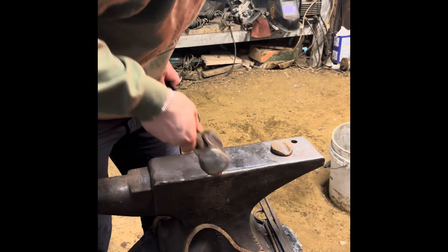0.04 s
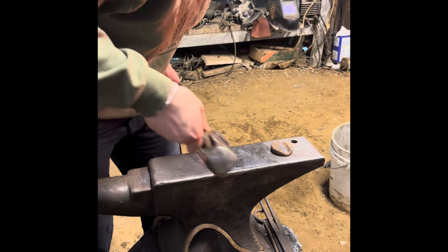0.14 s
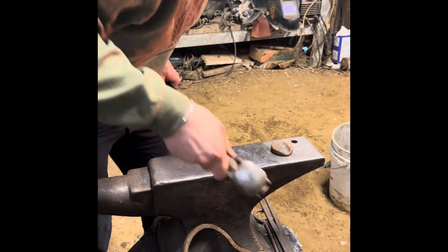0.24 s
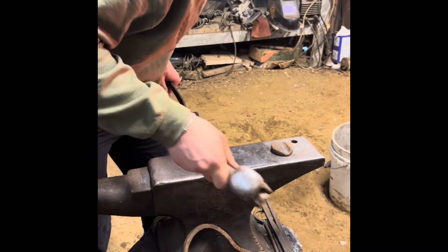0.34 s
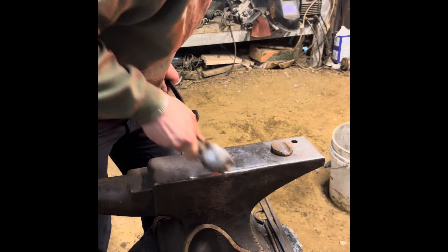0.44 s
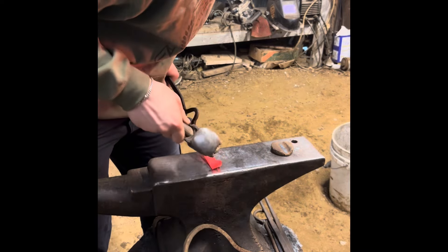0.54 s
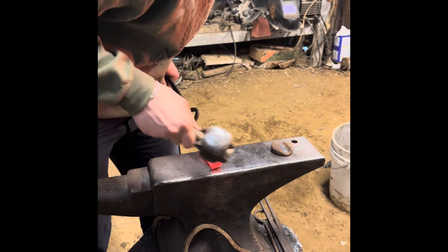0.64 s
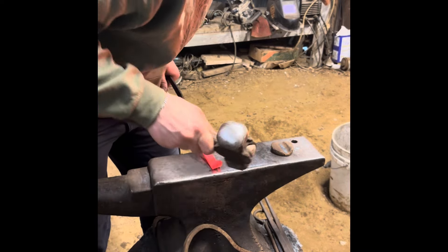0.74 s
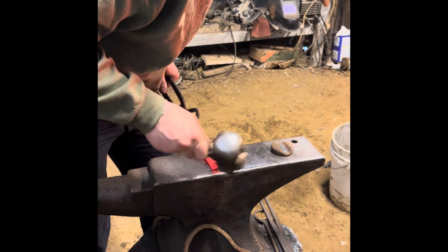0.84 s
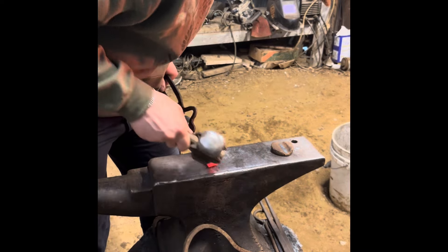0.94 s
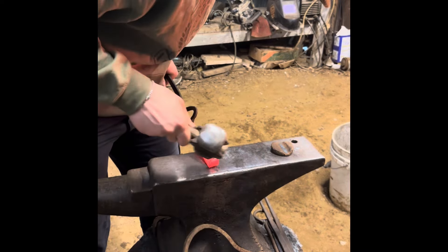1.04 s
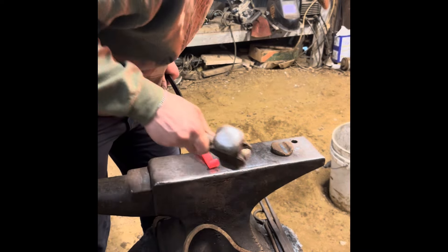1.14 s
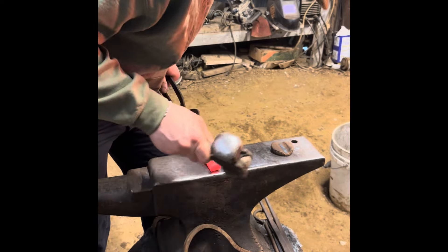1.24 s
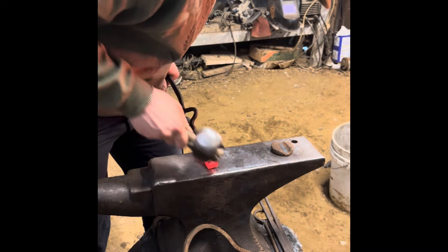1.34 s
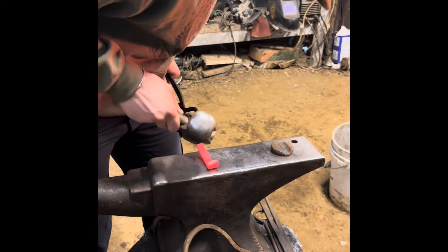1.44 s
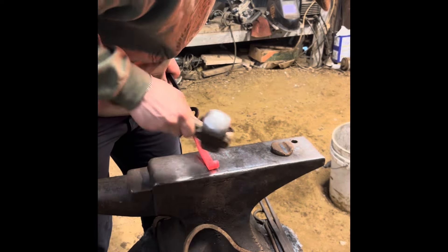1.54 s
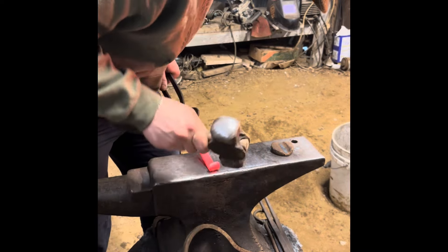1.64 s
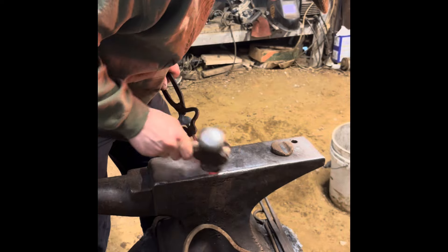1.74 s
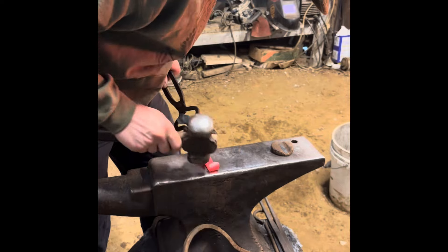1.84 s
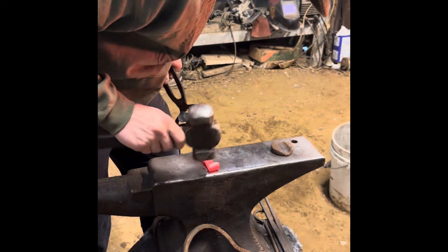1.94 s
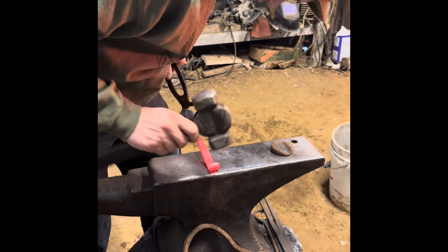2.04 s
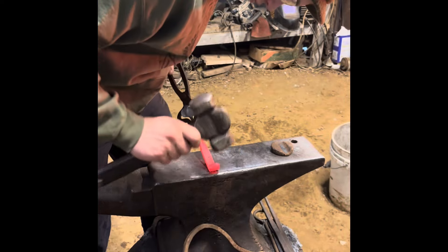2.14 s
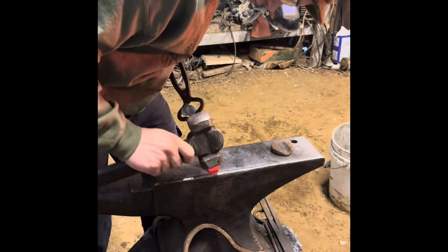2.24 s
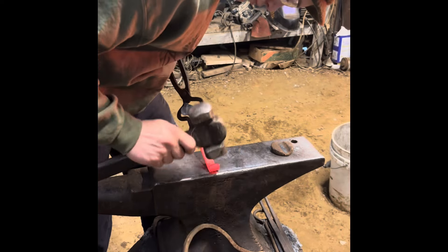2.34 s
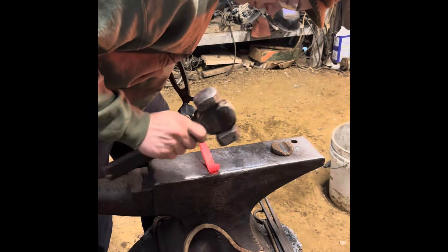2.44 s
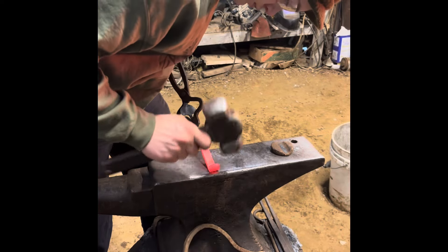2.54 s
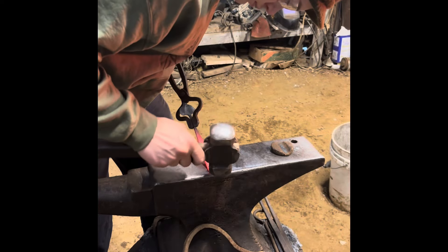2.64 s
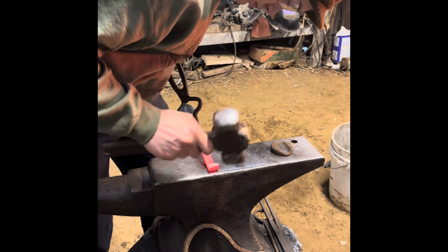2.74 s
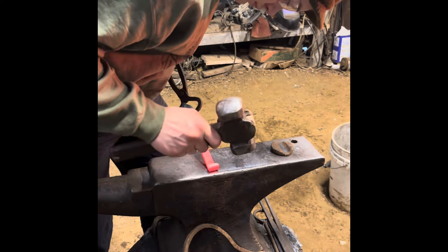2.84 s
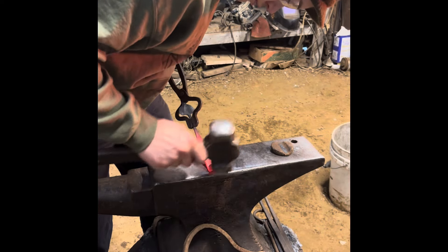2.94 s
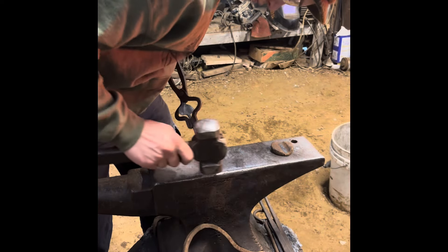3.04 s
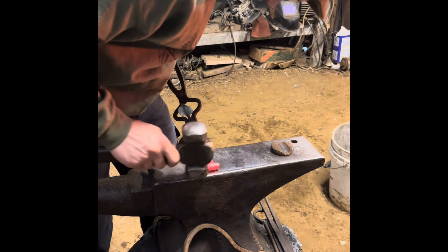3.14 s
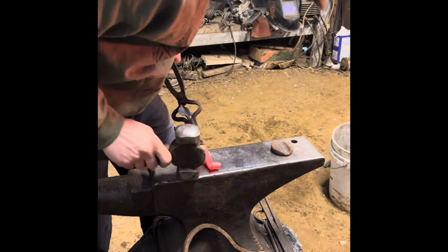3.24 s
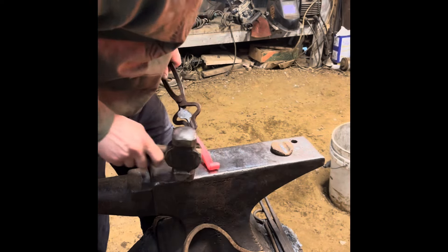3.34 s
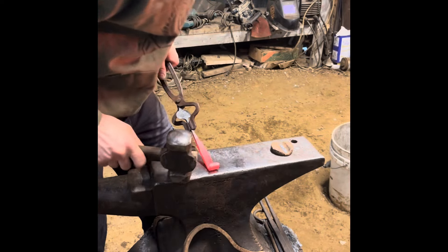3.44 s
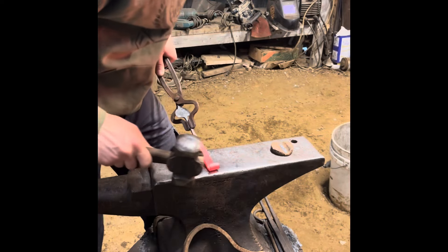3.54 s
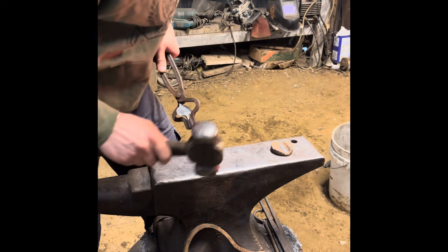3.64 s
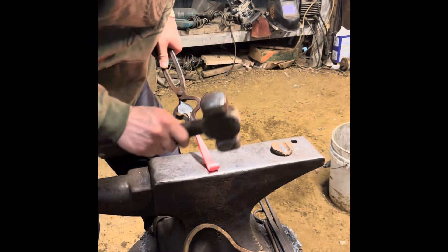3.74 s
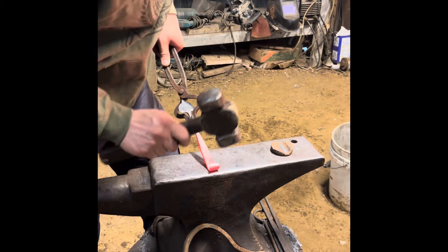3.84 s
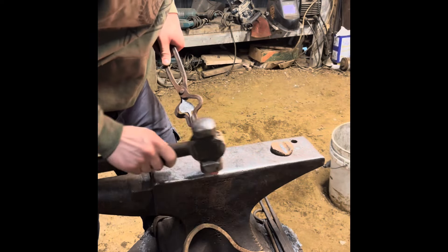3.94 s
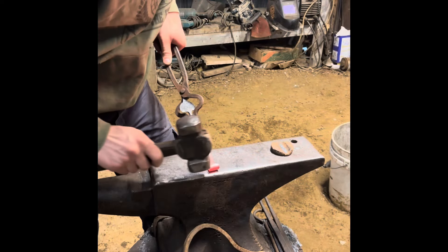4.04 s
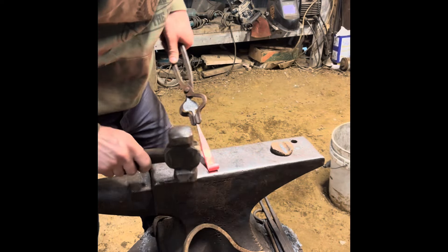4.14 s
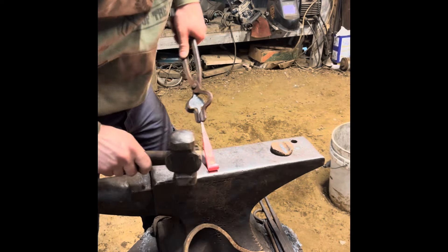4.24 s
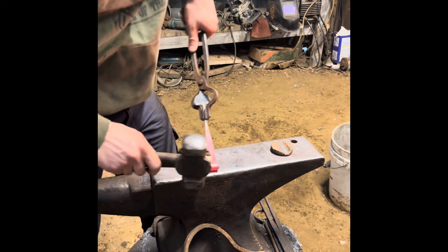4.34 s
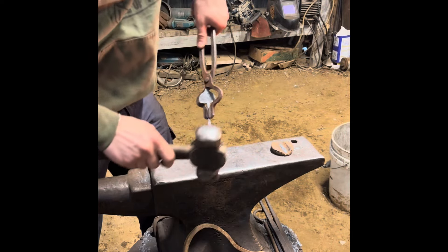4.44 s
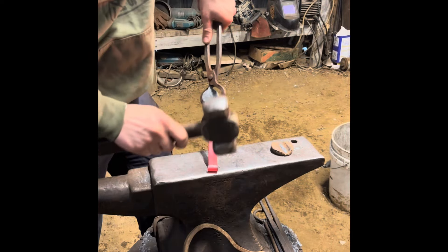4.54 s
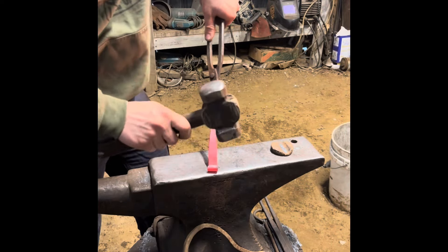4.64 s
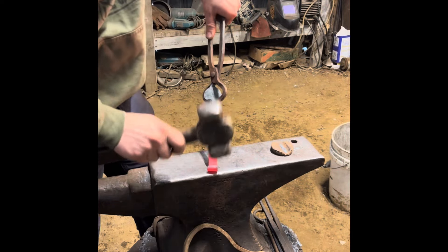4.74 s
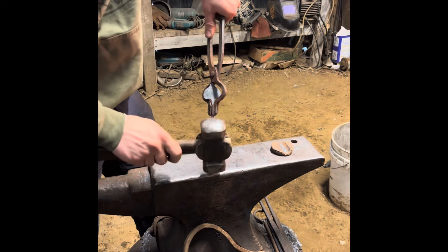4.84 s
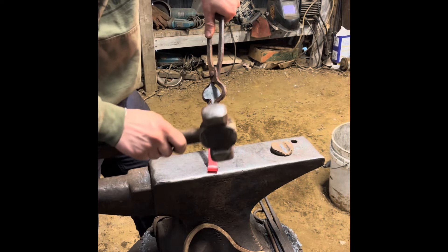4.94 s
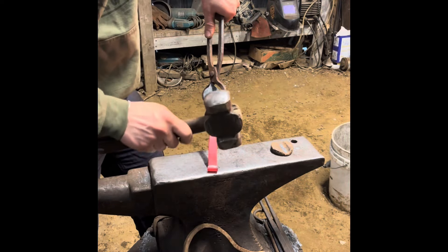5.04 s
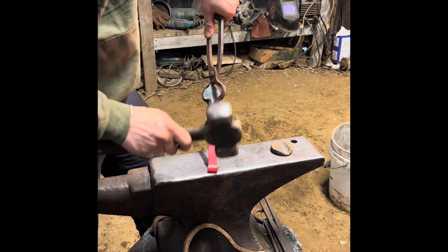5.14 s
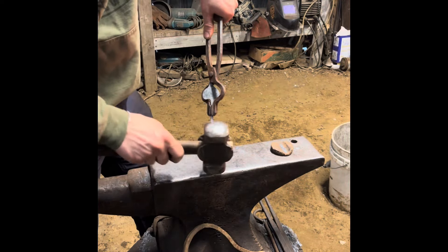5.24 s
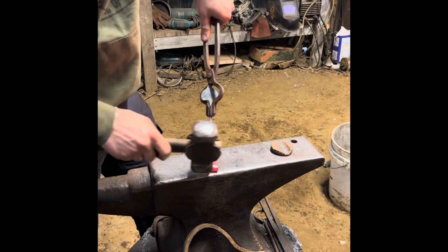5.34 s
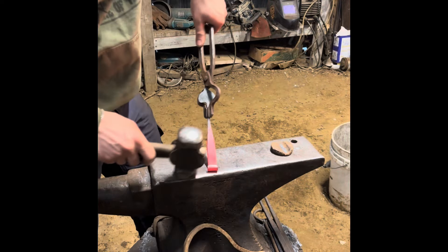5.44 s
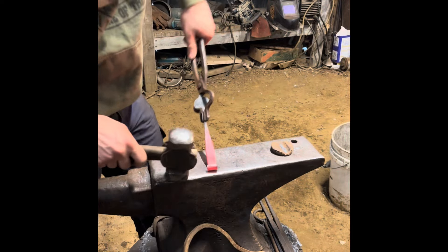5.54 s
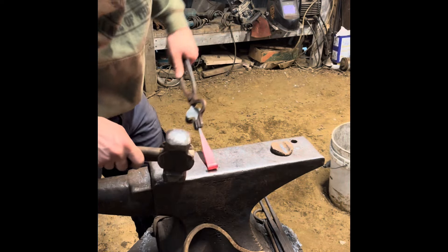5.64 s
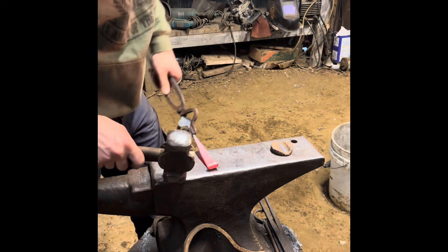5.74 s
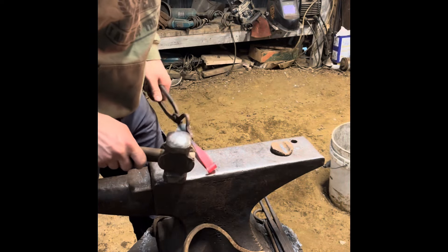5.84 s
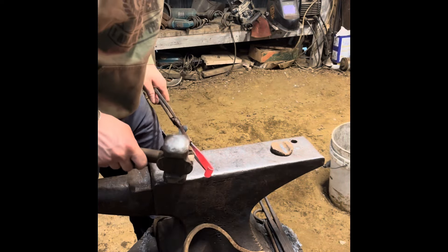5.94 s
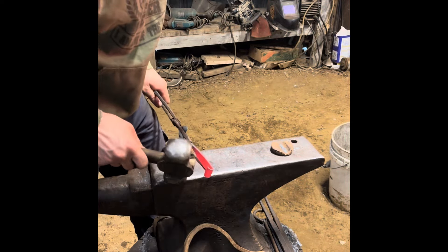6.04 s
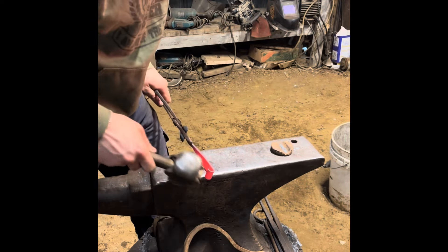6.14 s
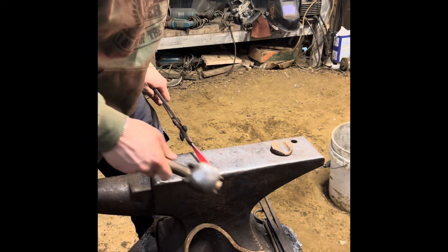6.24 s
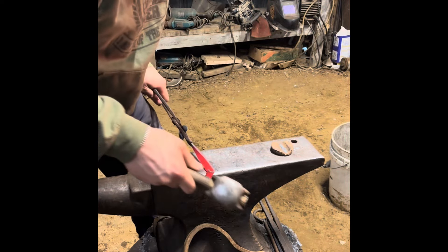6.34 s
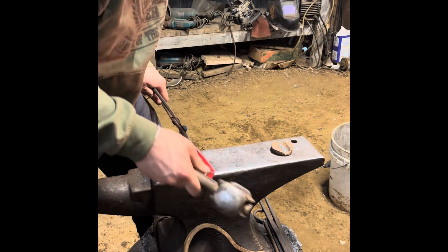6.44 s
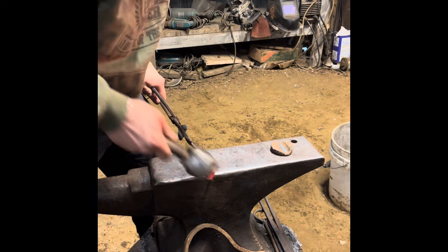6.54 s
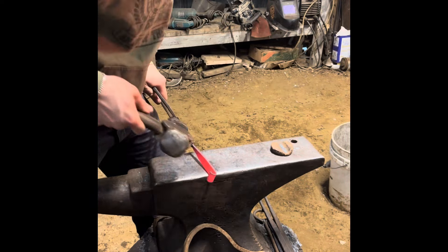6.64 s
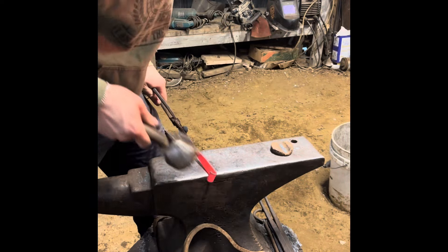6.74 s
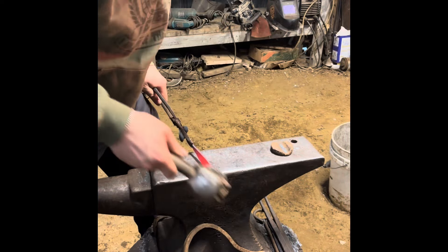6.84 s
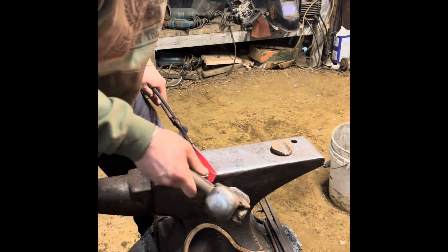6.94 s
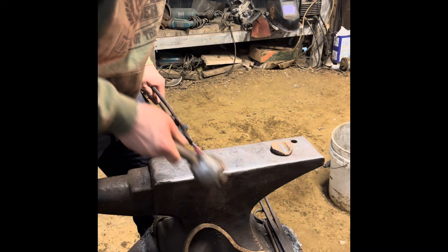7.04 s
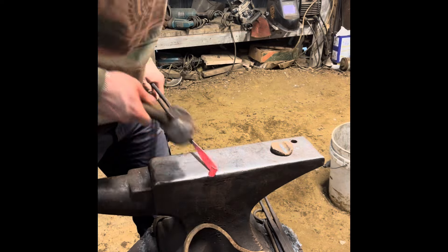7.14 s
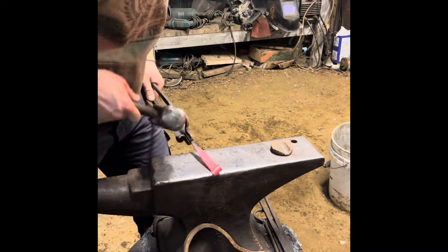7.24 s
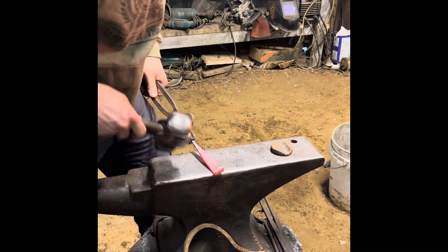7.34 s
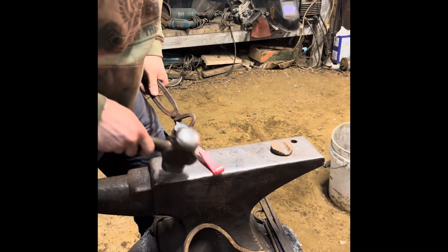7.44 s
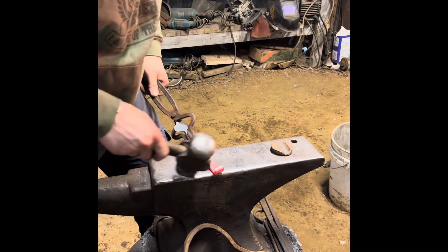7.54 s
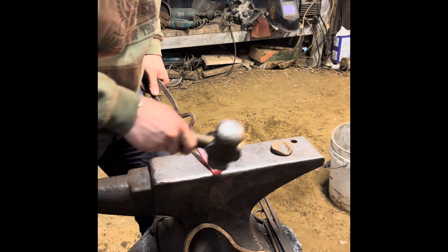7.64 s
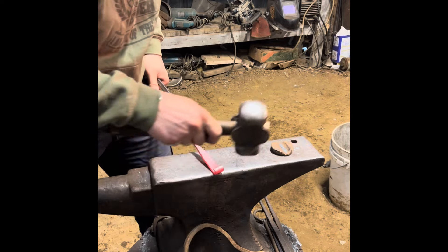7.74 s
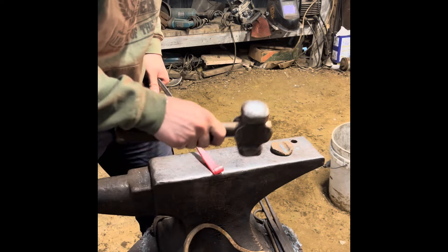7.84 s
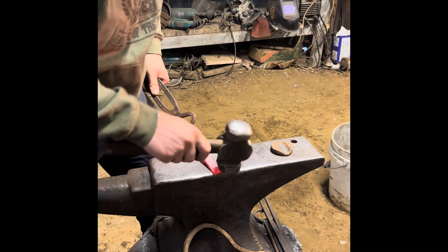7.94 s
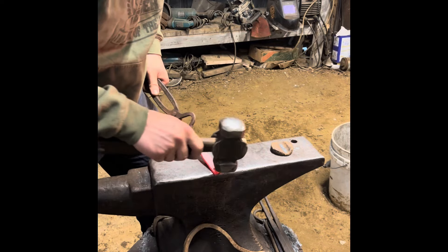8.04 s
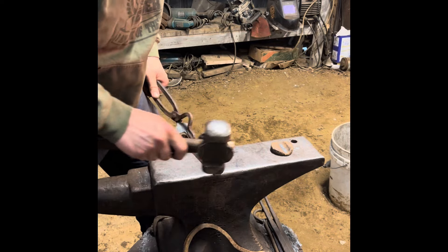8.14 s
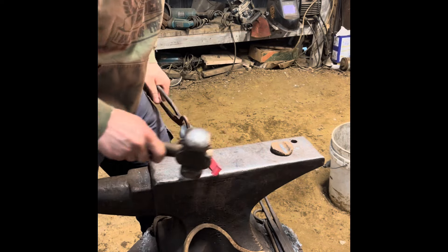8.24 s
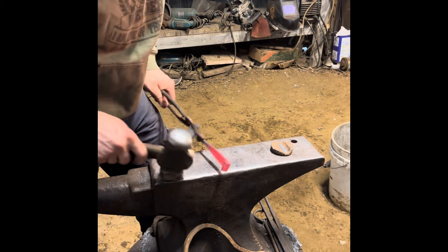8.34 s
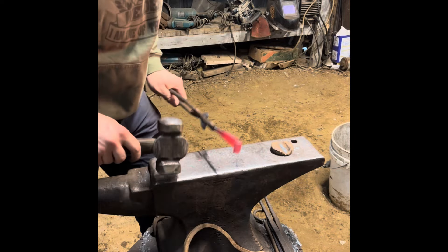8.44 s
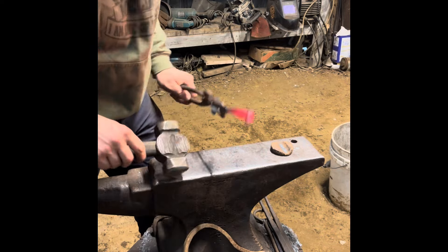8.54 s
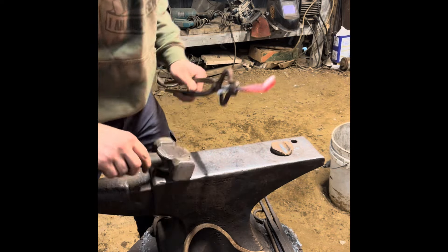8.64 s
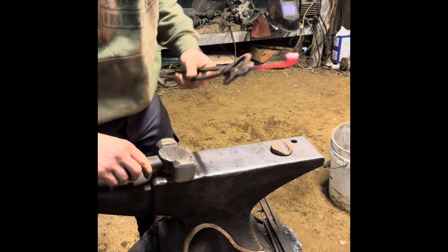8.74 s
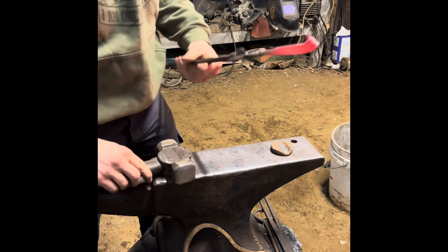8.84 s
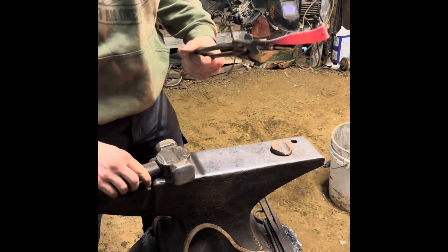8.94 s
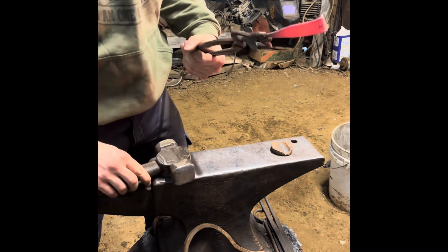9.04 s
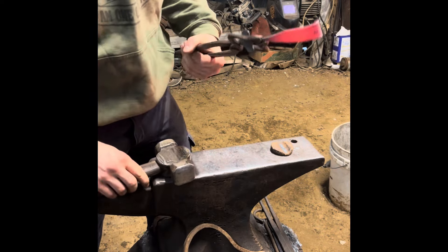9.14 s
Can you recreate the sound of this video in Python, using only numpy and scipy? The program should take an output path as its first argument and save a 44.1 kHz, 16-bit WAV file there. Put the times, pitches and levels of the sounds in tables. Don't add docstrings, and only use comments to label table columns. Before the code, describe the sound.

Over a constant low, humming forge roar, crunchy dull blows land on hot metal, then bright clinking bounces ring on the bare anvil. Blows and bouncing taps alternate, ending with a lighter flurry of taps that dies away. Close stereo phone microphone, a metre away, with brief hard echo from the shed walls.

```python
import sys
import numpy as np
from scipy import signal
from scipy.fft import rfft, irfft, next_fast_len
from scipy.io import wavfile
from scipy.ndimage import uniform_filter1d

SR = 44100
rng = np.random.default_rng(int(sys.argv[2]) if len(sys.argv) > 2 else 0)


def waveform_to_disk(signal):
    frames = np.transpose(np.atleast_2d(signal))
    scaled = np.clip(frames, -1, 1) * 32767
    samples = np.round(scaled).astype(np.int16)
    wavfile.write(sys.argv[1], SR, samples)


def volts_from_db(level):
    exponent = np.asarray(level, float) / 20
    return 10 ** exponent


N = 405279
LEAD = SR // 10
PITCH_PHASE = rng.uniform(0, 2 * np.pi, 64)

# pitch_hz, level_db, t60_s (time to fade by 60 dB)
LOW_TONES = [(1636, 0, .11), (1636, -11, .32), (1190, -22, .05)]
MIDDLE_TONES = [(3338, -4, 0.55), (3010, -25, 0.19), (4850, -14, .1)]
HIGH_TONES = [(8059, 0, .2), (5873, -12, .14), (6605, -4, .3), (6923, -14, .1), (7350, -8, .13),
              (7494, -12, .1), (9130, -16, .1), (9604, -12, .15), (11400, -10, .1)]


def colour(x, points):
    hz, db = np.transpose(points)
    size = 4096
    log_hz = np.log(np.fft.rfftfreq(size, 1 / SR) + 1)
    log_gain = np.log(volts_from_db(np.interp(log_hz, np.log(hz), db)))
    cepstrum = irfft(log_gain)[:size // 2]
    cepstrum[1:] *= 2
    response = irfft(np.exp(rfft(cepstrum, size)))[:size // 2]
    return signal.fftconvolve(x, response)[:len(x)]


def fade(t, t60):
    return np.exp(-np.log(1000) * t / t60)


def ring(tones, t, scatter_db, s=0, rise_cycles=17.0):
    chance = rng.standard_normal(len(tones))
    total = 0
    for (hz, db, t60), luck, phase in zip(tones, chance, PITCH_PHASE):
        swing = np.sin(2 * np.pi * hz * (t + s) + phase)
        swell = 1 - np.exp(-t * hz / rise_cycles)
        total = total + volts_from_db(db + scatter_db * luck) * swing * fade(t, t60) * swell
    return total


def peak(x, db):
    return x * volts_from_db(db) / np.abs(x).max()


def add(track, s, sound):
    i = LEAD + int(round(s * SR))
    track[i:i + len(sound)] += sound[:len(track) - i]


def walk(rate):
    k = int(SR / rate)
    held = np.repeat(rng.standard_normal(N // k + 1), k)
    return 1.2 * uniform_filter1d(uniform_filter1d(held, k), k)[:N]


def forge():
    # pitch_hz, level_db
    roar_shape = [(30, -41), (50, -27.5), (90, -26.5), (160, -18.5), (400, -15), (620, -27.5), (680, -24.5),
                  (1700, -30.5), (2100, -38), (4500, -45), (7000, -49.5), (11000, -56), (14000, -62),
                  (16000, -75)]
    # pitch_hz, width_hz, level_db
    resonances = [(133.7, 17, -11.5), (183.8, 19.4, -9.5), (245, 32.2, -2.5), (307.1, 52, 0.5),
                  (349.4, 7.9, 2.5), (384.5, 12.3, -4), (435.7, 12.3, -6.5), (492, 17.4, -10.5),
                  (560.5, 70.6, -11.5), (754, 28, -19), (853, 12.7, -17), (5010, 180, -34)]
    # time_s, level_db
    gas_swell = [
        (0.0, -27),
        (1.48, -26.5),
        (1.66, -27.5),
        (2.46, -26),
        (3.58, -27),
        (8.78, -27),
        (9.19, -27.5),
    ]
    f = np.fft.rfftfreq(N, 1 / SR) + 1e-3
    hz, db = np.transpose(roar_shape)
    power = volts_from_db(np.interp(np.log(f), np.log(hz), db)) ** 2
    for centre, width, level_db in resonances:
        power = power + volts_from_db(level_db) ** 2 / (1 + (2 * (f - centre) / width) ** 2) ** 2.02
    roar = rfft(rng.standard_normal((2, N))) * np.sqrt(power)
    out = 0
    for octave in range(10):
        share = np.clip(1 - np.abs(np.log2(f / 30) - octave), 0, 1)
        flicker_db = 1.5 * walk(2.18) + 0.82 * walk(14)
        out = out + irfft(roar * share, N) * volts_from_db(flicker_db)
    s, swell_db = np.transpose(gas_swell)
    out = out * volts_from_db(np.interp(np.arange(N) / SR, s, swell_db - swell_db.mean()))
    return out * volts_from_db(-25) / out.std()


def thump(db):
    # pitch_hz, level_db, t60_s
    stump_tones = [(63.5, -11.5, 0.33), (97, -6, 0.23), (130, -5, 0.28)]
    t = np.arange(SR // 2) / SR
    return volts_from_db(db) * ring(stump_tones, t, scatter_db=1.0, s=rng.uniform(), rise_cycles=0.22)


def blows():
    # start_s, crunch_db, body_db (against crunch), thump_db, anvil_ring_db
    bar_blows = [(-0.09, 3, -21, -43, -53), (0.4353, -6.5, -33, -36, -54), (0.8872, -13.5, -18, -34, -60),
                 (1.3123, -14.5, -16.5, -25, -58), (1.749, -10, -47, -26.5, -54),
                 (2.2311, -4.5, -5, -25.5, -46), (2.6219, -10, -26, -23.5, -38),
                 (2.9714, -17, 1.5, -26, -38), (3.9581, -7, -2, -26, -42), (4.792, -3.5, -16, -26, -53),
                 (5.2142, -4.5, -7.5, -25.5, -52), (6.5191, -11, -10, -36, -37),
                 (7.038, -11.5, -1.5, -41, -45), (7.9433, -13, -22, -24, -38)]
    # pitch_hz, level_db
    crack_shape = [(3000, 5), (4200, 2.5), (5200, 9), (6600, 13), (7500, 0), (9500, 3), (11500, -0.5),
                   (13500, -0.5), (15300, -0.5), (16800, -25.5)]
    # pitch_hz, level_db
    body_shape = [(200, -20), (700, 16.5), (1500, 2), (2500, -38.5), (3500, 5.5), (5000, 0)]
    squash_ms, bright_db = 3.4, 2.3
    (steel, wood), t = np.zeros((2, LEAD + N)), np.arange(SR // 2) / SR
    tilted = [(hz, d + bright_db * np.log2(hz / 8000)) for hz, d in crack_shape]
    for s, db, body_db, thump_db, ring_db in bar_blows:
        grit = rng.standard_normal((3, len(t)))
        squash = np.exp(-(t * 1000 / squash_ms) ** 3) + 0.18 * fade(t, 0.2)
        squash = np.minimum(t / 0.00052, 1) * squash * volts_from_db(5.7 * grit[2])
        crack = peak(colour(squash * grit[0], tilted), db)
        body = peak(colour(squash * grit[1], body_shape), db + body_db)
        head = volts_from_db(-30) * ring(HIGH_TONES, t, scatter_db=4.0) * fade(t, .15)
        anvil_tones = LOW_TONES[:1] + MIDDLE_TONES[:1]
        anvil = volts_from_db(ring_db) * ring(anvil_tones, t, scatter_db=1.0, rise_cycles=70.) * fade(t, 1.1)
        add(steel, s, crack + body + volts_from_db(db) * head + anvil)
        add(wood, s, thump(thump_db))
    return steel, wood


def shed(steel):
    # pitch_hz, t60_s
    echo_times = [(300, 0.065), (1500, 0.37), (4000, 0.32), (9000, 0.21), (16000, 0.027)]
    gap_s = 0.0029
    t = np.arange(SR // 2) / SR
    hz, t60 = np.transpose(echo_times)
    edges = 125 * 2 ** np.arange(0, 7.6, .5)
    echo = 0
    for lo, hi in zip(edges, np.minimum(edges[1:], .49 * SR)):
        half_octave = signal.butter(2, (lo, hi), "bandpass", fs=SR, output="sos")
        band = signal.sosfilt(half_octave, rng.standard_normal((2, len(t))))
        echo = echo + band * fade(t, np.interp(np.log(lo), np.log(hz), t60))
    echo = echo * np.clip(t / gap_s - .5, 0, 1)
    echo = volts_from_db(-8) * echo / np.sqrt(np.mean(np.sum(echo ** 2, 1)))
    return signal.fftconvolve(steel[None], echo, axes=1)[:, :len(steel)]


def settle(s, flight, db):
    rebound, shortest_flight_s = .785, .0065
    low_db, middle_db = -14, -30
    hops = []
    while flight > shortest_flight_s:
        s, flight = s + flight, flight * rebound
        hops.append((s, db, low_db, middle_db))
        db = db + 20 * np.log10(rebound)
    return hops + [(s + flight / (1 - rebound), -60, 0, 0)]


def taps():
    # start_s, knock_db, low_ring_db, middle_ring_db
    bounces = [(3.2078, 0.5, -12, -10.5), (3.3005, -1, -10.5, -14), (3.3618, -4, -11, -10),
               (3.4059, -7.5, -7, -24), (3.4392, -8.5, -11, -11), (3.4683, -15, -4.5, -9),
               (4.163, 0.5, -11, -8), (4.267, -1, -10.5, -15.5), (4.3535, -17.5, -6.5, -10.5),
               (5.4652, -1, -9.5, -16.5), (5.5573, -1.5, -10.5, -16.5), (5.6189, -4, -13, -19),
               (5.6641, -9, -8, -27), (5.696, -11.5, -8, -44), (7.4822, -8.5, -8, -16.5),
               (8.346, -12, -9.5, -17), (8.6268, -15.5, -9, -18), (8.6628, -5, -14, -13),
               (8.765, -5.5, -19, -24), (8.8174, -12, -13, -26), (8.8487, -10.5, -21, -48),
               (8.871, -23.5, -13, -8)]
    # last_bounce_s, next_flight_s, next_knock_db
    let_go = [
        (3.4683, .019, -25),
        (5.696, .024, -16),
    ]
    # first_s, contact_ms, high_ring_db, head_ring_db
    spots = [
        (3.2, 0.052, -13.5, -24),
        (4.16, 0.11, -18, -26),
        (5.46, 0.053, -13, -24),
        (7.48, 0.11, -1.5, -28),
        (8.34, 0.073, -10, -40),
        (8.62, 0.045, -8.5, -41),
    ]
    # pitch_hz, t60_s
    spot_tones = [(2013, 0.099), (2288, 0.42), (3557, 0.27), (4393, 0.36)]
    # one row a spot, one column a tone, level_db
    spot_ring = [(-34, -38, -27, -39), (-30, -35, -25, -27), (-24, -29, -21, -36), (-6, -38, -36, -40),
                 (-30, -40, -24, -44), (-20, -30, -19, -21)]
    spot_clatter_db = [-6, -9, -6, -6, -11, 0]
    # pitch_hz, level_db, t60_s
    head_tones = [(12220, -11, .35), (13120, -10, .4), (14870, 0, .2)]
    # pitch_hz, level_db
    knock_shape = [(300, -22), (700, -7), (1300, -5.5), (1800, -1), (2700, -10.5), (3600, -1), (5000, -57),
                   (7000, -68), (11000, -27), (14000, -24), (16500, -52)]
    # pitch_hz, level_db
    clatter_shape = [(500, -54), (1000, -28), (2000, -0.5), (3000, 0.5), (4500, -4.5), (7000, -14),
                     (12000, -24), (16800, -60)]
    # lowest_db, highest_db
    graze_db = (-50, -16)
    high_per_db, clatter_per_db = 1.6, .5
    low_twin_hz, low_twin_share = 10.5, .4
    middle_twin_hz, middle_twin_share, middle_twin_t60_s = 30, .6, .3

    (steel, bells, wood), t = np.zeros((3, LEAD + N)), np.arange(SR) / SR
    hops = sorted(bounces + [hop for row in let_go for hop in settle(*row)])
    gaps = np.diff(np.array(hops)[:, 0], append=N / SR)
    firm = np.array([h[0] for h in hops if not graze_db[0] < h[1] < graze_db[1]] + [N / SR])
    short = t[:SR // 8]
    for (s, db, low_db, middle_db), gap in zip(hops, gaps):
        run = sum(row[0] - .04 < s for row in spots) - 1
        _, ms, high_db, head_db = spots[run]
        high_db = high_db + high_per_db * db
        clatter_db = spot_clatter_db[run] + clatter_per_db * db

        ms = max(ms, .015) * volts_from_db(-.25 * db)
        push = np.exp(-(short * 1000 / ms - 2) ** 2)
        push = push + .8 * np.exp(-((short - .0008) * 1000 / ms - 2) ** 2)

        loose = rng.standard_normal((2, len(short)))
        grains = volts_from_db(3.7 * uniform_filter1d(loose[1], size=30) * 5.1)
        rattle = fade(short, 0.0062) + 0.55 * fade(short, 0.077)
        clatter = colour(loose[0] * grains * rattle, clatter_shape)

        choke = fade(np.maximum(t - gap, 0), 0.0046)
        held = fade(np.maximum(t + s - firm[firm > s][0], 0), 0.02)
        low = volts_from_db(low_db) * ring(LOW_TONES, t, 0.44, s, rise_cycles=9.) * (0.4 + 1.0 * choke)
        low = low * (1 + low_twin_share * np.cos(2 * np.pi * low_twin_hz * t))

        middle = volts_from_db(middle_db) * ring(MIDDLE_TONES, t, 1.0, s, rise_cycles=30.)
        beat = np.cos(2 * np.pi * middle_twin_hz * t) * fade(t, middle_twin_t60_s)
        middle = middle * (1 - middle_twin_share * beat)
        spot = [(hz, d, t60) for (hz, t60), d in zip(spot_tones, spot_ring[run])]
        middle = middle + volts_from_db(.6 * (middle_db + 12)) * ring(spot, t, 1., s, rise_cycles=15.)

        high = volts_from_db(high_db) * ring(HIGH_TONES, t, 3.5, s, rise_cycles=11.0)
        high = high + volts_from_db(head_db + .5 * db) * ring(head_tones, t, 4., s)

        add(steel, s + .0004, peak(colour(push, knock_shape), db) + peak(clatter, db + clatter_db))
        add(bells, s, volts_from_db(db) * (low + middle * (0.13 + 0.71 * held) + high * (0.033 + 0.13 * choke)))
        add(wood, s, thump(db - 28.0))
    return steel, bells, wood


def scene():
    flame = forge()
    crunch, boom = blows()
    knocks, bells, bumps = taps()
    steel = crunch + knocks
    near = steel + bells + boom + bumps + shed(steel + 0.3 * bells)
    return near[:, LEAD:] + np.sqrt(2) * flame


def roll_off(x):
    return signal.sosfilt(signal.butter(12, 16550, fs=SR, output="sos"), x)


def record(dry):
    # pitch_hz, left_leads_radians, width (0-1), left_minus_right_db
    ports = [(40, 0, .06, 0), (130, -.08, .05, .3), (300, -.42, .1, 0), (650, -.7, .6, -2),
             (1000, -.3, .75, -2), (1800, .1, .3, -1.5), (2600, 2.2, .55, 0), (3300, 1.6, .7, -1.5),
             (4800, 1.3, .6, -2.5), (5450, 2.3, .15, 0), (5900, np.pi, .03, 0), (8200, 2 * np.pi, .02, 0),
             (18200, 6 * np.pi, .02, 0)]
    hz, lead, width, pan_db = np.transpose(ports)
    size = next_fast_len(N + SR // 10)
    f = np.fft.rfftfreq(size, 1 / SR)
    mid = rfft((dry[0] + dry[1]) / 2, size)
    side = rfft((dry[0] - dry[1]) / 2, size) * np.interp(f, hz, width)
    turn = np.exp(1j * np.interp(f, hz, lead) / 2) * volts_from_db(np.interp(f, hz, pan_db) / 2)
    pair = irfft([(mid + side) * turn, (mid - side) / turn], size)[:, :N]
    pair = signal.sosfilt(signal.butter(3, 45., "highpass", fs=SR, output="sos"), pair)
    pair = signal.sosfilt(signal.ellip(8, .2, 60, 16550, fs=SR, output="sos"), pair)
    pair = 1.1 * np.tanh(pair / 1.1)
    return roll_off(pair)


dry = scene()
out = record(dry)
waveform_to_disk(out)
```